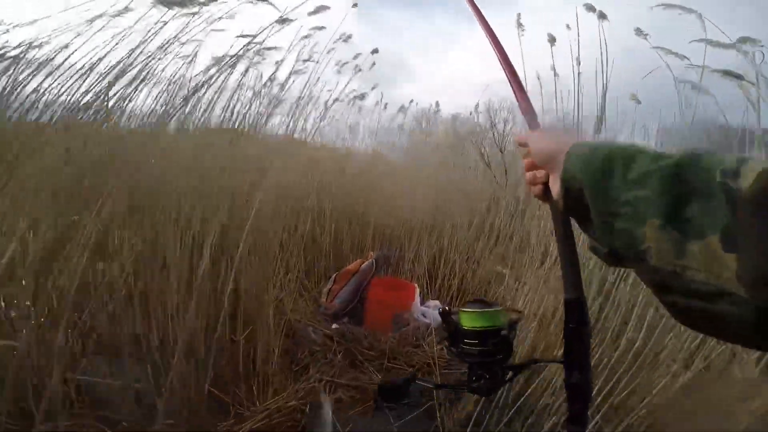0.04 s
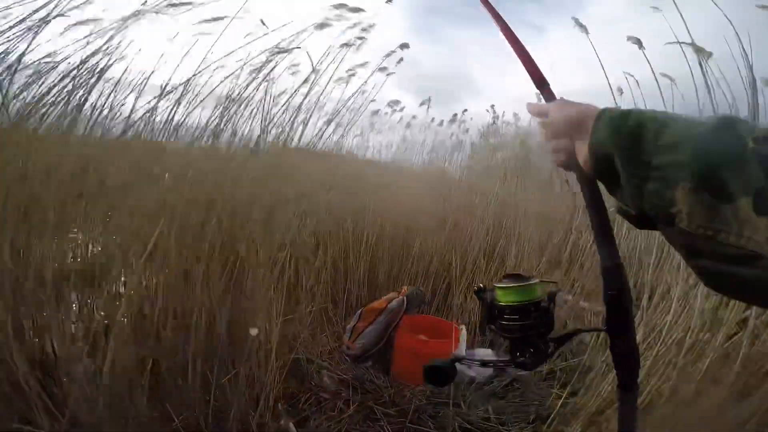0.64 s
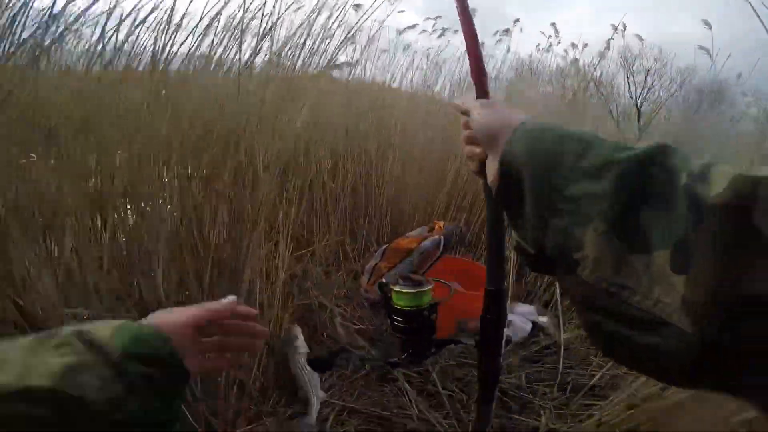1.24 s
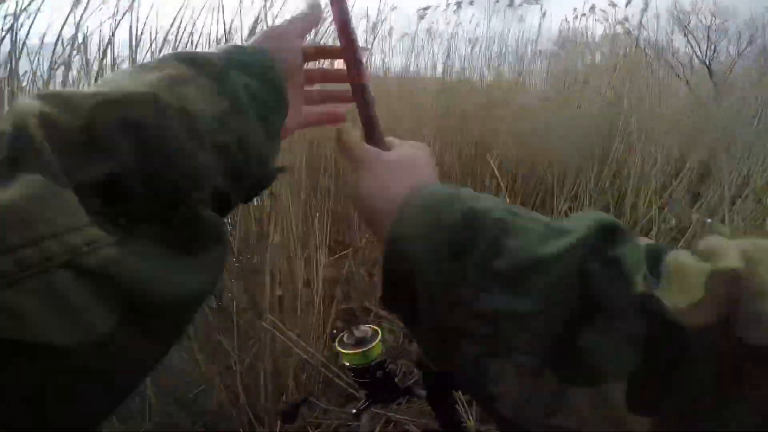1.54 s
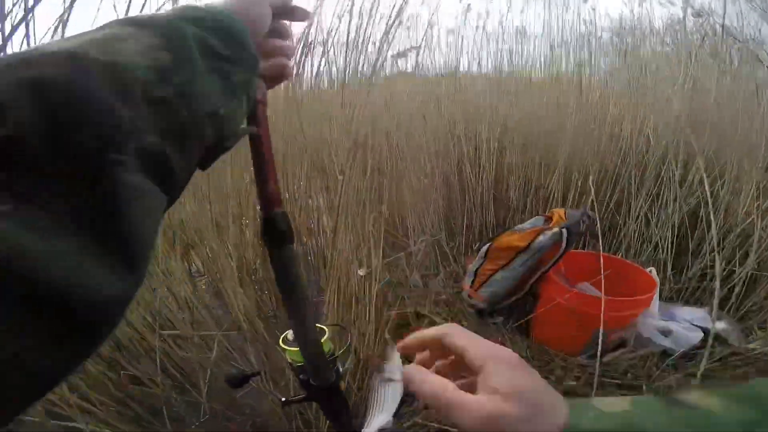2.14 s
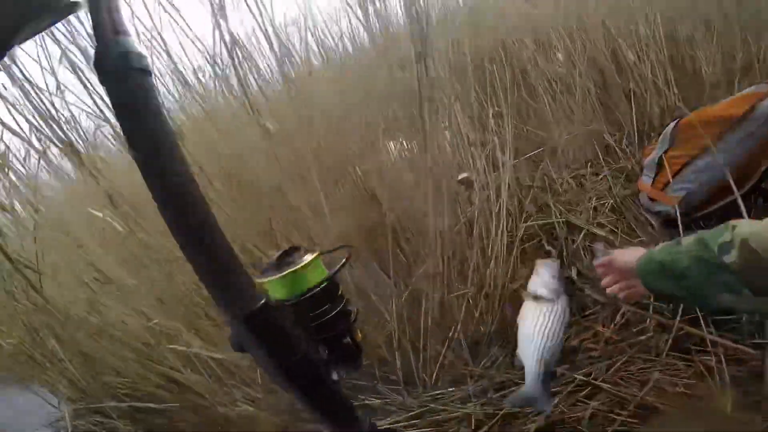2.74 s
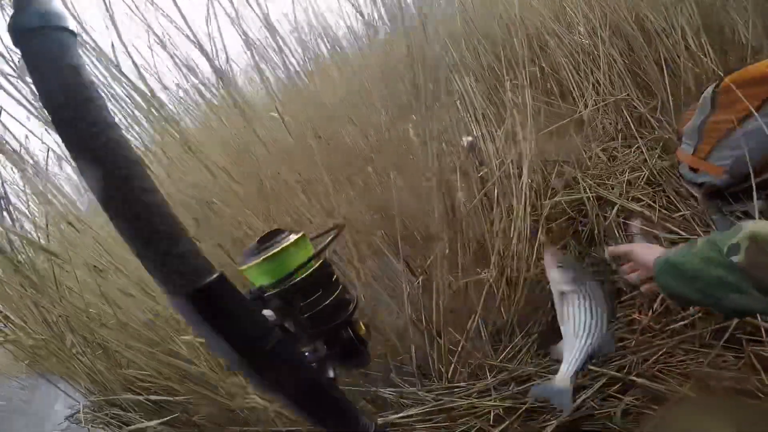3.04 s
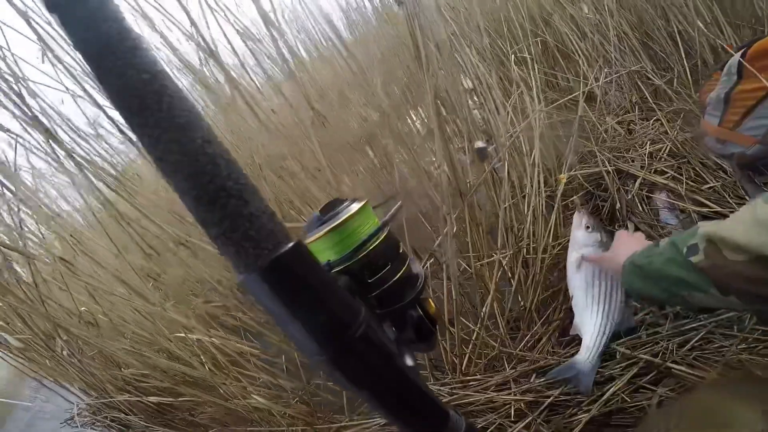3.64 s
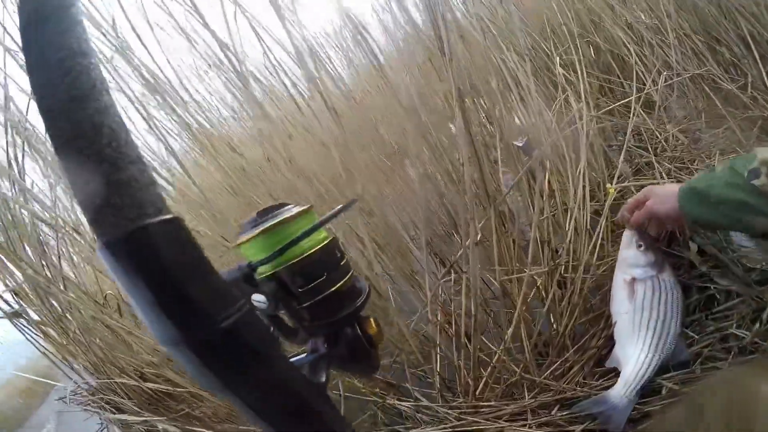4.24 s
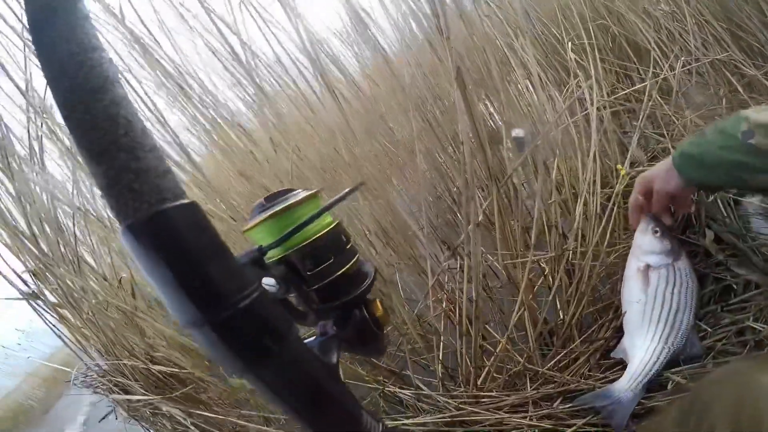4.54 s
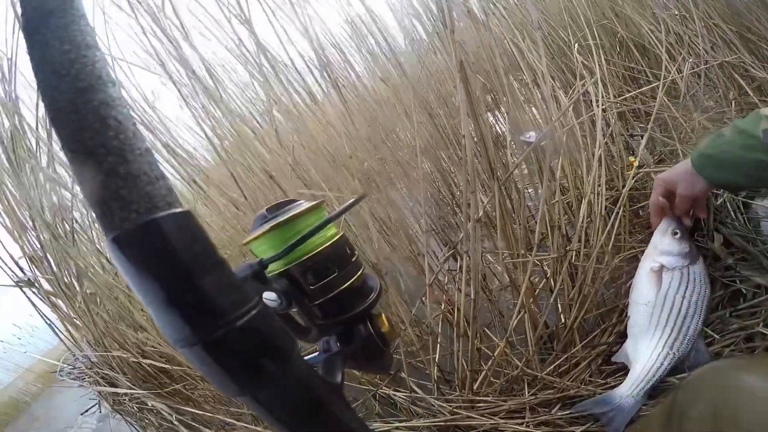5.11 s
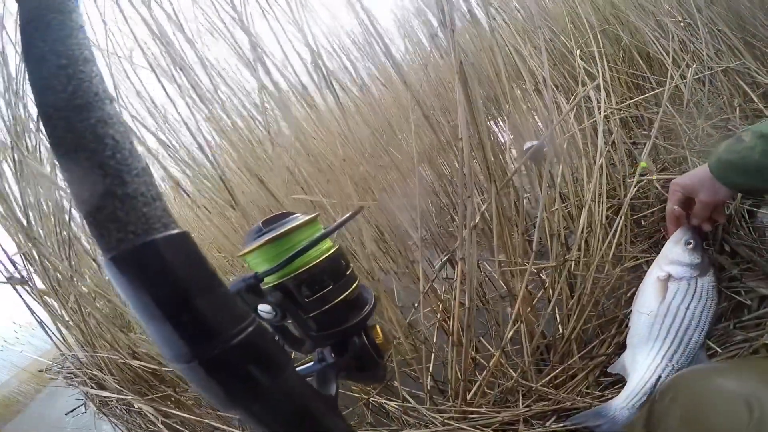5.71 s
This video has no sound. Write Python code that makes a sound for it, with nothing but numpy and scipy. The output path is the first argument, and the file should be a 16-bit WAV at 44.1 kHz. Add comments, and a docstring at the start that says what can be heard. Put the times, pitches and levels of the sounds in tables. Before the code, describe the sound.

Close, sharp snaps and crunches of dry reed stems mix with rustling sleeves as an angler moves about in a reed bed. Underneath run a far engine's low, clattering drone, a very faint machine whine and the hiss of reeds. In the second half the crackling thins out and wind takes over, rumbling and thumping on the microphone, strongest near the end.

```python
"""A reed bed on a windy shore. Gusts buffet the microphone and single eddies slap it, while far off
a slow engine thuds with each firing, hums and clatters, and some machine whines faintly.
Close by, an angler reaches for a fish: sleeves rustle, trampled stems snap, crunch and squeak,
with a few hollow knocks and light pings. All around, dry reeds hiss and tick in the wind."""
import sys
import numpy as np
from scipy import signal
from scipy.fft import rfft, irfft, next_fast_len
from scipy.io import wavfile
from scipy.ndimage import uniform_filter1d

SR = 44100
rng = np.random.default_rng(int(sys.argv[2]) if len(sys.argv) > 2 else 0)


def to_wav(s):
    """Save 16-bit WAV."""
    ch = np.atleast_2d(s).T  # columns
    pcm = np.round(np.clip(ch, -1, 1) * 32767)  # PCM
    wavfile.write(sys.argv[1], SR, pcm.astype(np.int16))


N = 254454


def undb(db):
    """Decibels to gain."""
    return 10 ** (np.asarray(db) / 20)


def unit(x):
    """Scale to an rms of one."""
    return x / np.sqrt(np.mean(x ** 2) + 1e-18)


def curve(table, column=1):
    """One column of a table, joined by straight lines in time."""
    rows = np.array(table)
    return np.interp(np.arange(N) / SR, rows[:, 0], rows[:, column])


def colour(x, points):
    """Causal filter through (frequency [Hz], gain [dB]) points; the result has an rms of one."""
    hz, db = np.transpose(points)
    size = 2 * next_fast_len(N // 2 + 4096)
    f = np.maximum(np.arange(size // 2 + 1) * SR / size, 1)
    cepstrum = irfft(np.log(undb(np.interp(np.log(f), np.log(hz), db))))
    cepstrum[1:size // 2] *= 2  # fold to minimum phase
    cepstrum[size // 2 + 1:] = 0
    return unit(irfft(rfft(x, size) * np.exp(rfft(cepstrum)))[:N])


def ring(x, hz, q):
    """One resonance."""
    return signal.lfilter(*signal.iirpeak(min(hz, SR / 2 - 1000), max(q, .7), fs=SR), x)


def walk(rate):
    """Random levels held 1 / rate s and smoothed twice; rms of one."""
    hold = max(int(SR / rate), 1)
    steps = np.repeat(rng.standard_normal(N // hold + 2), hold)
    return unit(uniform_filter1d(uniform_filter1d(steps, hold), hold)[:N])


def noise():
    """White noise."""
    return rng.standard_normal(N)


def burst(t, t60):
    """Noise that dies by 60 dB in t60 seconds."""
    return rng.standard_normal(len(t)) * np.exp(-np.log(1000) * t / t60)


def ticks(rate, spread_db):
    """Random clicks: many small, a few large."""
    size = undb(spread_db * np.minimum(rng.exponential(size=N), 4))
    return unit((rng.random(N) < rate / SR) * size * rng.choice([-1, 1], N))


def stems(rate, spread_db, q):
    """Clicks on stems of many sizes, each with its own short ring."""
    pitches = np.geomspace(1100, 14000, 14)
    return unit(sum(np.sqrt(hz) * unit(ring(ticks(rate, spread_db), hz, q)) for hz in pitches))


def swells(events, rise_share, release_s, floor_db):
    """Gain of events that build over a share of their length, hold and die away, over a floor."""
    t = np.arange(N) / SR
    power = undb(floor_db) ** 2
    for s, length, db in events:
        rise = np.clip((t - s) / (rise_share * length), 0, 1)
        fall = np.exp(-np.maximum(t - s - length, 0) / release_s)
        power = power + (undb(db) * rise * fall) ** 2
    return np.sqrt(power)


def add(out, s, sound):
    """Mix a sound in at a time."""
    start = max(int(s * SR), 0)
    out[start:start + len(sound)] += sound[:N - start]


def wind():
    """Turbulence on the microphone; small eddies grow faster than large ones as a gust rises."""
    # gusts that hit the microphone: (start [s], length [s], relative level [dB])
    gusts = [(2.01, 0.22, -20), (2.45, 0.1, -24), (2.79, 0.26, -19), (3.15, 0.47, -19), (3.66, 0.25, -17.5),
             (4.27, .38, -17.5), (4.86, .25, -18), (5.38, 0.19, -20.5), (5.535, 0.21, -12.5)]
    # spectra of the buffeting and of the small eddies: (frequency [Hz], relative level [dB])
    buffet_spectrum = [(10, -21), (25, 3), (55, -0.5), (90, -2), (140, -7.5), (220, -17), (330, -26.5),
                       (500, -53), (700, -49), (1500, -58), (6000, -100)]
    eddy_spectrum = [(60, -0.5), (150, 1), (300, 0.5), (450, -5), (560, -15.5), (680, -21.5), (1200, -39.5),
                     (2500, -72), (8000, -100)]
    breeze_db = -37.5 + 2.48 * np.arange(N) / SR  # the breeze between gusts freshens steadily
    gust_db = 20 * np.log10(swells(gusts, rise_share=.3, release_s=0.075, floor_db=breeze_db))
    buffet = colour(noise(), buffet_spectrum) * undb(gust_db - 1.0 + 1.75 * walk(21.9))
    eddies = colour(noise(), eddy_spectrum) * undb(2.09 * gust_db + 7.0 + 3.43 * walk(45))
    return buffet + eddies


def slaps():
    """An eddy passing the microphone sucks and then pushes, once."""
    # single eddies: (time [s], peak [dB], swing frequency [Hz])
    eddies = [(2.172, -13, 85), (3.619, -20, 75), (4.415, -7.5, 66.4), (4.608, -5.5, 132),
              (5.035, -11.5, 65)]
    out, t = np.zeros(N), np.arange(N) / SR
    for s, db, hz in eddies:
        swing = 2 * np.pi * hz * (t - s)
        out += undb(db) * swing * np.exp((1 - swing ** 2) / 2)
    return out


def engine():
    """Far off, each firing is one swing of pressure; a driven shaft hums and the machinery clatters."""
    # the engine's running: (time [s], firing rate [Hz], thud level [dB])
    running = [(0, 30.53, -24.5), (2, 30.38, -25), (3.8, 30.49, -20.5), (5.77, 30.41, -26.5)]
    # exhaust thud: (multiple of the firing rate, relative level [dB])
    thud_lines = [(1, -2), (2, 1.5), (3, 0), (4, -4), (5, -7), (6, -9.5), (7, -17.5), (8, -16), (9, -17.5),
                  (10, -26.5)]
    # hum of the faster shaft: (multiple of its speed, relative level [dB])
    hum_lines = [(2, -5), (3, -5), (4, -19.5), (5, -10.5), (6, -25)]
    # machinery clatter: (time [s], level [dB])
    clatter_level = [(0, -34), (2.2, -33), (4, -34), (4.8, -37.5), (5.77, -36.5)]
    # the clatter, dulled by distance: (frequency [Hz], relative level [dB])
    clatter_spectrum = [(20, -12), (50, -7.5), (130, -5), (230, -1), (330, 1), (440, 1), (510, -1.5),
                        (590, -12.5), (650, -13.5), (900, -40.5)]
    first_firing_s, drive_ratio = 0.00375, 2.899
    firing_hz = curve(running)
    firings = np.cumsum(firing_hz) / SR - first_firing_s * firing_hz[0]
    uneven = firings + 0.0028 * walk(30)
    thud = unit(sum(undb(db) * np.sin(2 * np.pi * k * uneven) for k, db in thud_lines))
    thud *= undb(0.78 * walk(29.97))
    hum = np.zeros(N)
    for k, db in hum_lines:  # moving air makes each line waver
        gain = undb(db + 1.04 * walk(8))
        phase = 2 * np.pi * k * drive_ratio * firings + 0.1 * walk(15) + 2 * np.pi * rng.random()
        hum += gain * np.sin(phase)
    pulsing = 1 + 0.39 * np.cos(2 * np.pi * firings)
    clatter = colour(noise() * pulsing, clatter_spectrum) * undb(curve(clatter_level) + walk(11.0))
    return (thud + undb(0.5) * hum) * undb(curve(running, column=2)) + clatter


def effort_db():
    """How hard the angler disturbs sleeves and stems: each movement builds up, then they settle."""
    # movements of the arms and the fish: (start [s], length [s], relative level [dB])
    moves = [(.03, .1, -46), (.28, 0.28, -48.5), (.72, 0.3, -44.5), (1.1, 0.24, -44.5), (1.28, 0.1, -40.5),
             (1.995, .055, -40.5), (2.31, .11, -49.5), (2.755, 0.054, -43.5), (2.87, 0.18, -45.2),
             (3.105, .045, -43.5), (3.88, .18, -65), (4.55, 0.47, -59.5)]
    rest_db = -63  # cloth still rustles faintly at rest
    return 20 * np.log10(swells(moves, rise_share=0.25, release_s=0.15, floor_db=rest_db))


def handling():
    """Close by, cloth and stems slip in small bursts: sharp clicks, ringing stems and rubbing hiss."""
    # crackle of sleeves and stems: (frequency [Hz], relative level [dB])
    crackle_spectrum = [(900, 3), (1700, -8), (2700, 14), (3800, 3.5), (5200, 8.5), (6200, 1), (7300, -3.5),
                        (8600, -4.5), (9800, 0), (11500, -8.5), (13300, 1.5), (15300, -6)]
    clicks = ticks(rate=3900, spread_db=0.5)
    ringing = undb(6.5) * stems(rate=200, spread_db=1.0, q=9.7)
    rubbing = undb(0.5) * noise()
    slips = (clicks + ringing + rubbing) * undb(2.3 * walk(90))
    return colour(slips, crackle_spectrum) * undb(effort_db() + 3.5)


def snaps():
    """A near stem breaks in a quick run of fibres that ring its hollow tube and spit treble."""
    # breaking stems: (time [s], peak [dB], ring [Hz], fibre t60 [s], relative splinter level [dB])
    breaks = [(0.4663, -15.5, 5470, .004, -2), (0.531, -26, 5100, 0.014, -17),
              (0.843, -22.5, 1200, .012, -44), (1.222, -26, 2760, 0.029, -8),
              (1.3268, -19, 2400, 0.026, -15), (1.383, -22, 2700, 0.016, -22),
              (1.409, -16, 2390, 0.031, -23), (1.5558, -21.5, 3980, 0.025, -18),
              (1.89, -22, 4200, 0.015, -23), (1.927, -25.5, 2900, 0.043, -12),
              (2.022, -20, 3900, 0.046, -11), (2.8, -18.5, 2650, 0.064, -11),
              (2.911, -21.5, 2430, 0.039, -13), (3.1238, -12.5, 2600, 0.024, -15),
              (3.138, -18, 2820, 0.012, -16), (4.683, -28, 3380, 0.01, -31), (5.045, -28, 3440, .014, -25)]
    out, t = np.zeros(N), np.arange(SR // 5) / SR
    treble = signal.butter(2, 6000, "high", fs=SR, output="sos")
    for s, db, hz, t60, splinter_db in breaks:
        fibres = burst(t, t60)
        tube = unit(ring(ring(fibres, hz, q=4.0), hz, q=1.24))
        splinters = undb(splinter_db + 9.5) * unit(signal.sosfilt(treble, fibres))
        snap = tube + splinters
        add(out, s, snap / np.abs(snap).max() * undb(db))
    return out


def crunches():
    """Matted stems, trodden or brushed aside, give way in short, dull, grainy swells."""
    # crushed stems: (start [s], relative level [dB], centre [Hz], half-length [s])
    crushes = [(0.077, -34.5, 3360, 0.047), (.085, -36.5, 1370, 0.048), (0.305, -31, 1380, 0.018),
               (0.311, -36.5, 3000, 0.063), (0.421, -42, 3100, 0.045), (0.405, -42, 750, 0.023),
               (0.677, -36, 1230, 0.05), (0.675, -33, 2720, 0.025), (0.808, -37.5, 1200, 0.051),
               (0.897, -38, 1300, 0.09), (1.35, -35, 1150, 0.039), (1.954, -42.5, 2300, 0.09),
               (2.322, -42, 3300, 0.064), (2.78, -39, 1300, 0.026), (4.74, -42, 830, .03)]
    grains_per_s = 900
    out, t = np.zeros(N), np.arange(SR // 3) / SR
    for s, db, hz, half_length in crushes:
        grains = rng.standard_normal(len(t)) * (rng.random(len(t)) < grains_per_s / SR)
        crunch = unit(ring(ring(grains, hz, q=3.2), hz, q=0.81))
        progress = np.minimum(t / (2 * half_length), 1)
        swell = np.sin(np.pi * np.sqrt(progress)) ** 2
        add(out, s, crunch * swell * undb(db - 2.5))
    return out


def knocks():
    """A soft bump on something hollow nearby, with a rough, low ring."""
    # bumps: (time [s], peak [dB], ring [Hz], t60 of the push [s])
    bumps = [(.42, -32, 480, 0.049), (.569, -27.5, 600, 0.028), (0.873, -21, 268, 0.17)]
    out, t = np.zeros(N), np.arange(SR // 4) / SR
    for s, db, hz, t60 in bumps:
        bump = ring(ring(burst(t, t60), hz, q=4), hz, q=3.1)
        add(out, s, bump / np.abs(bump).max() * undb(db))
    return out


def straw():
    """Thin, dry straws near the microphone crack with a brief spit of treble."""
    # cracking straws: (time [s], peak [dB])
    cracks = [(0.653, -30), (.963, -29), (2.184, -28), (2.276, -28.5), (2.419, -30), (3.908, -36),
              (4.0, -38), (4.045, -36), (5.215, -35)]
    out, t = np.zeros(N), np.arange(SR // 10) / SR
    for s, db in cracks:
        tick = ring(burst(t, t60=0.011), hz=12500, q=0.81)
        add(out, s, tick / np.abs(tick).max() * undb(db))
    return out


def pings():
    """Light pings, probably the fishing tackle: one high mode swells and is damped at once."""
    # light taps: (time [s], peak [dB], ring [Hz])
    taps = [(4.3056, -32, 5270), (4.9062, -30.5, 5220)]
    rise_s = 0.0012
    out, t = np.zeros(N), np.arange(SR // 20) / SR
    envelope = t / rise_s * np.exp(1 - t / rise_s)
    for s, db, hz in taps:
        add(out, s, undb(db) * envelope * np.sin(2 * np.pi * hz * t))
    return out


def squeaks():
    """Stems that rub together catch and chirp for a few milliseconds, more so as they are handled."""
    chirps = np.zeros(N)
    for hz in np.geomspace(1100, 3700, 12):
        catches = ticks(rate=9, spread_db=2.0)
        chirps += unit(ring(ring(catches, hz, q=hz / 300), hz, q=hz / 400))
    return unit(chirps) * undb(0.95 * effort_db() - 6.0)


def reed_bed():
    """All around, countless dry leaves merge into a hiss, with nearer stems ticking through it."""
    # the reeds in the wind: (time [s], level [dB])
    reed_level = [(0, -40), (.6, -43), (1.3, -42), (1.8, -45.5), (2.3, -41.5), (2.9, -39), (3.7, -39),
                  (4.2, -40.5), (4.7, -39), (5.3, -41), (5.77, -40)]
    # their hiss: (frequency [Hz], relative level [dB])
    reed_spectrum = [(600, -4.5), (800, 0.5), (1300, 0.5), (1850, -4), (2700, 1), (3300, -2), (4400, -9),
                     (5200, -10), (6000, -17.5), (7600, -22), (8700, -29.5), (10000, -17.5), (11300, -39),
                     (13000, -20), (15300, -42)]
    leaves = noise() * undb(0.87 * walk(25.25))
    near_stems = undb(-7.5) * stems(rate=130, spread_db=5.5, q=5.1)
    return colour(leaves + near_stems, reed_spectrum) * undb(curve(reed_level) + 0.04)


def whine():
    """Some distant machine slowly loses speed and grows a little louder."""
    start_hz, sag_hz_per_s = 599, 7.3
    start_db, rise_db_per_s = -53.5, 0.98
    t = np.arange(N) / SR
    phase = 2 * np.pi * np.cumsum(start_hz - sag_hz_per_s * t) / SR + 0.5 * walk(9.1)
    return np.sqrt(2) * np.sin(phase) * undb(start_db + rise_db_per_s * t + 1.7 * walk(6.06))


def scene():
    """Far sources, the angler close by and the wind, all at one microphone."""
    far = engine() + whine() + reed_bed()
    near = handling() + snaps() + straw() + crunches() + knocks() + pings() + squeaks()
    return (far + near + wind() + slaps())[None]


def record(dry):
    """The recorder drops the deepest rumble, rounds the strongest gusts and cuts the top."""
    bottom_hz, top_hz, ceiling = 4, 15400, .7
    low_cut = signal.butter(1, bottom_hz, "high", fs=SR, output="sos")
    high_cut = signal.ellip(10, .2, 80, top_hz, fs=SR, output="sos")
    sound = signal.sosfilt(low_cut, dry)
    rounded = sound / (1 + (sound / ceiling) ** 4) ** .25
    soft_ends = signal.windows.tukey(N, .001)
    return signal.sosfilt(high_cut, rounded * soft_ends)


dry = scene()
out = record(dry)
to_wav(out)
```